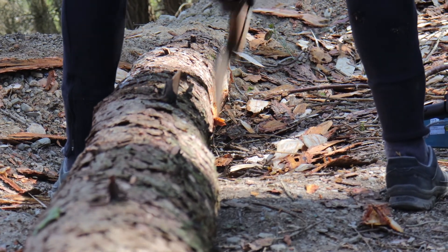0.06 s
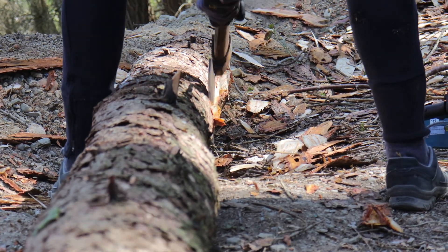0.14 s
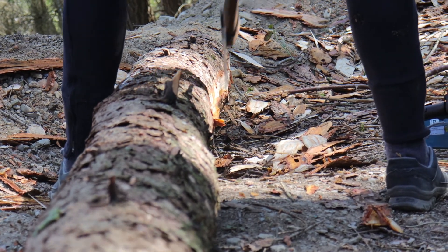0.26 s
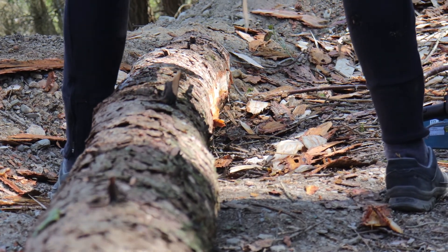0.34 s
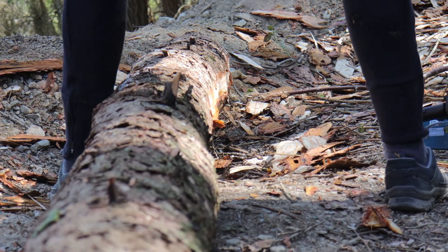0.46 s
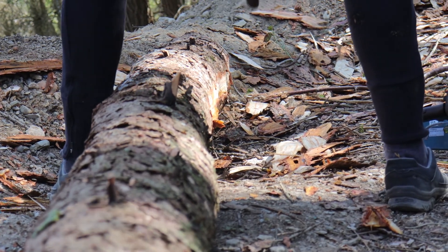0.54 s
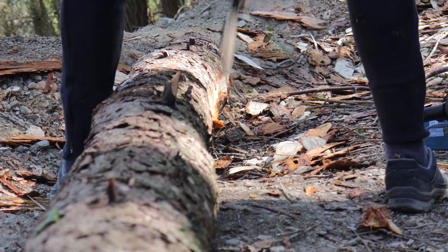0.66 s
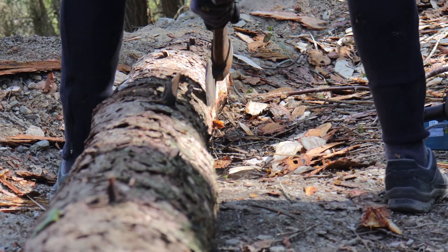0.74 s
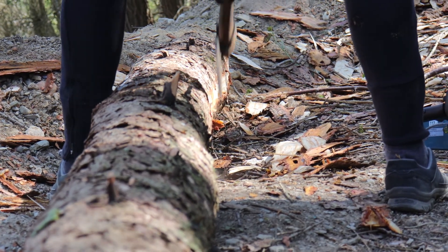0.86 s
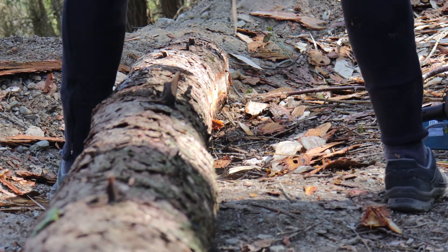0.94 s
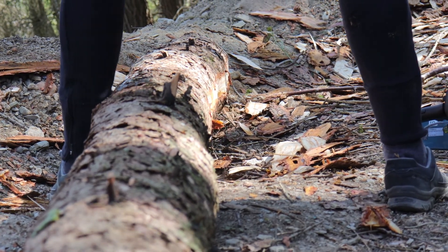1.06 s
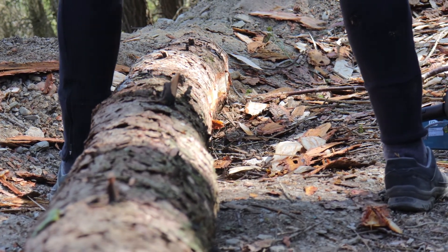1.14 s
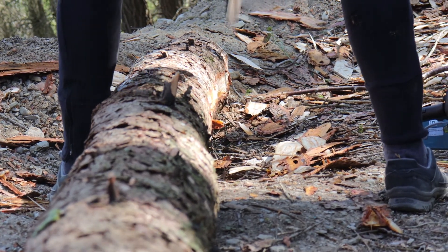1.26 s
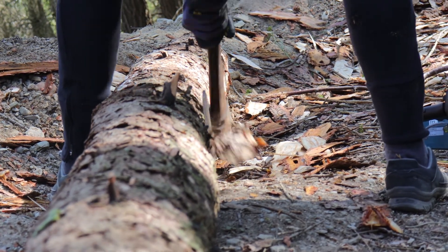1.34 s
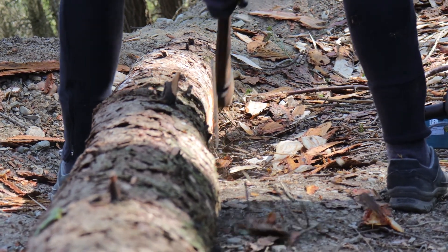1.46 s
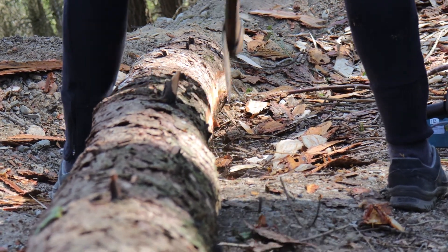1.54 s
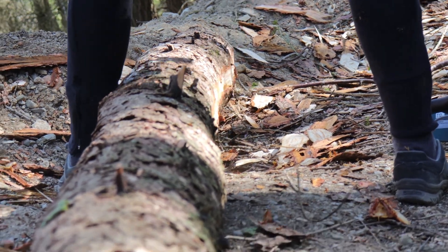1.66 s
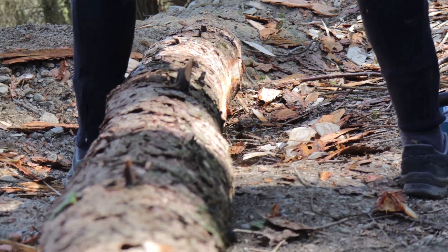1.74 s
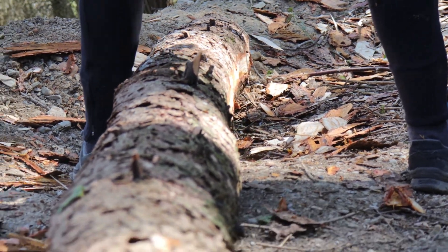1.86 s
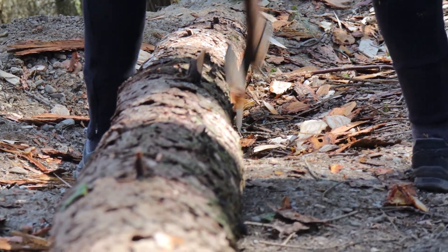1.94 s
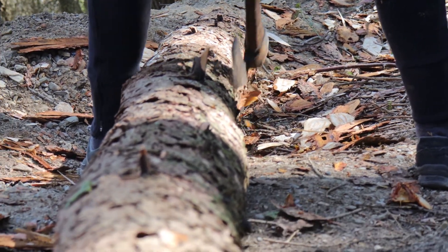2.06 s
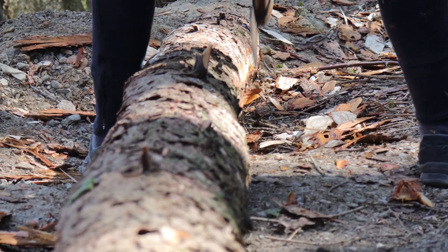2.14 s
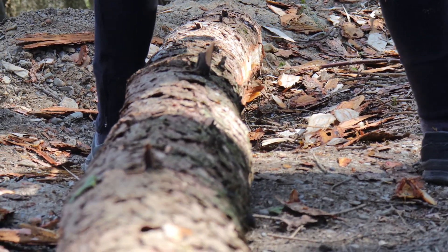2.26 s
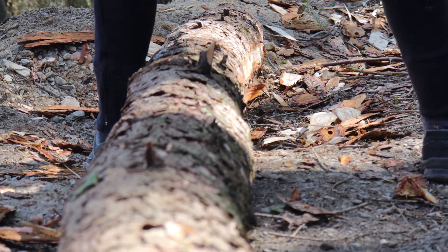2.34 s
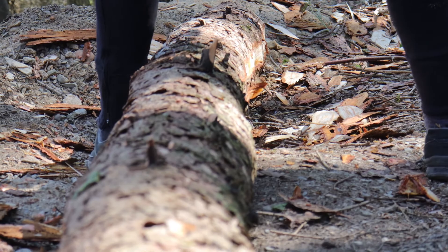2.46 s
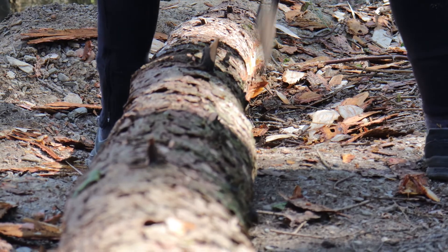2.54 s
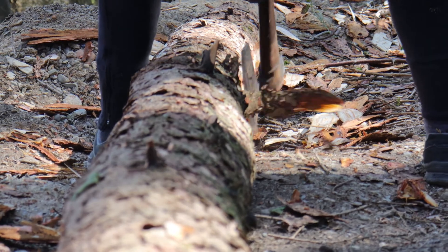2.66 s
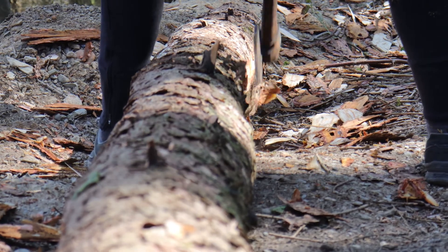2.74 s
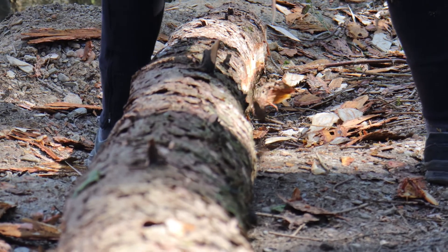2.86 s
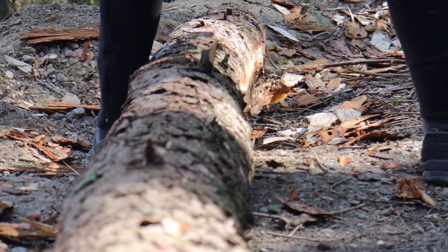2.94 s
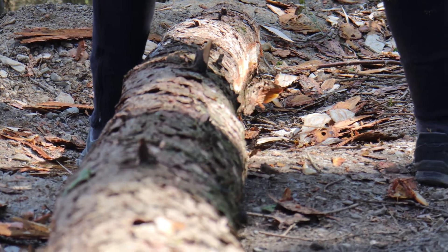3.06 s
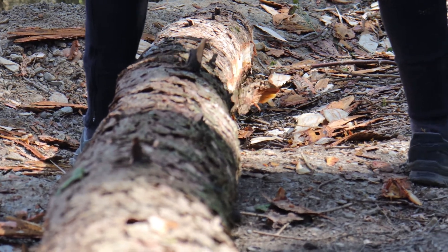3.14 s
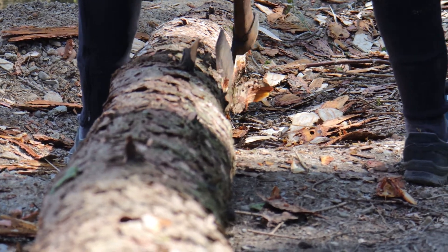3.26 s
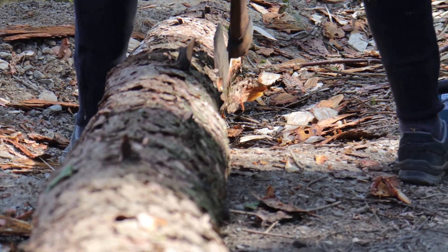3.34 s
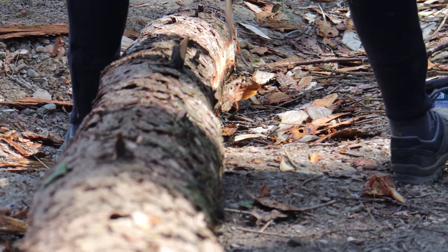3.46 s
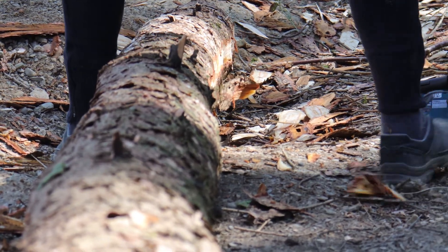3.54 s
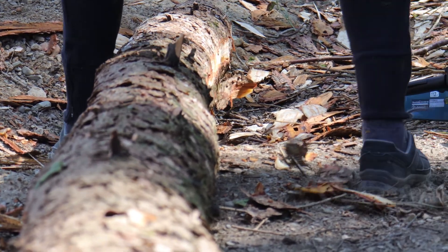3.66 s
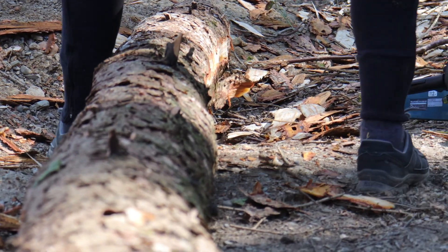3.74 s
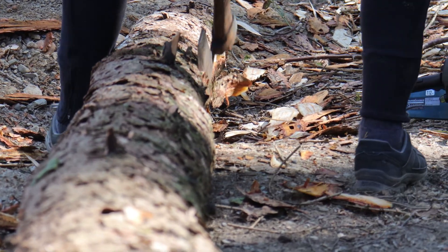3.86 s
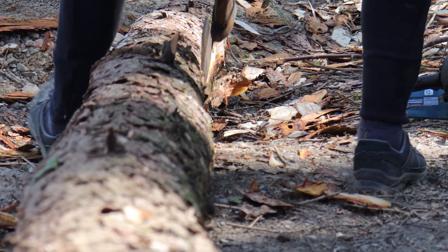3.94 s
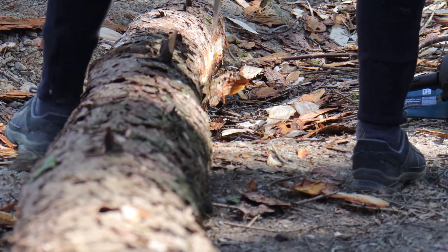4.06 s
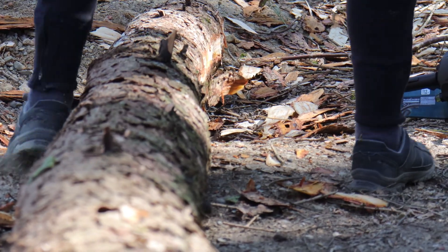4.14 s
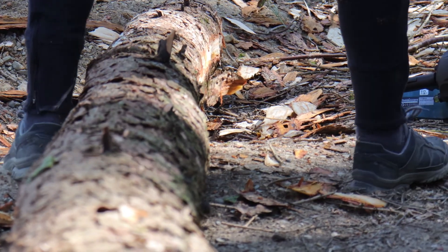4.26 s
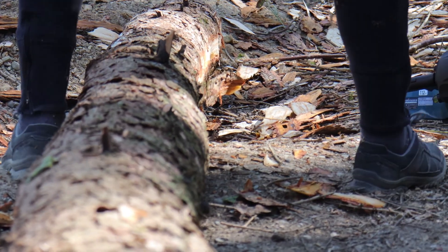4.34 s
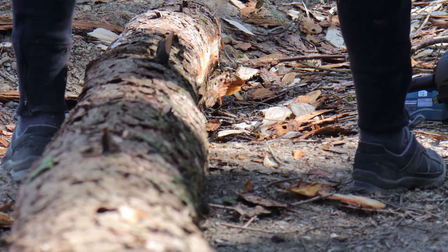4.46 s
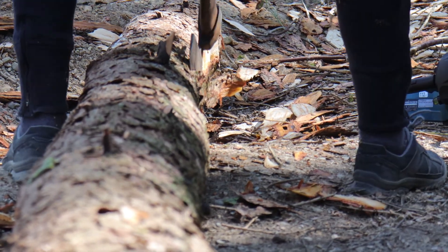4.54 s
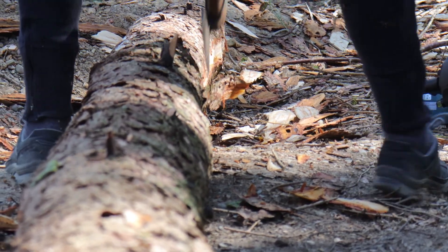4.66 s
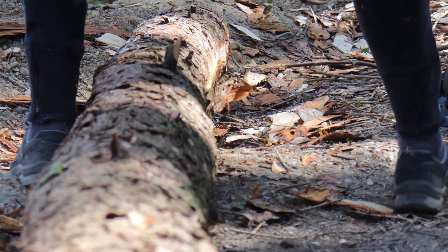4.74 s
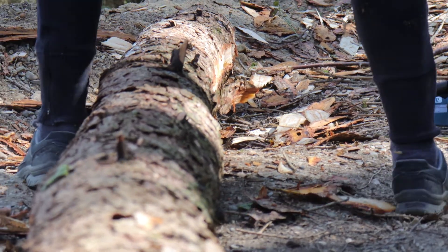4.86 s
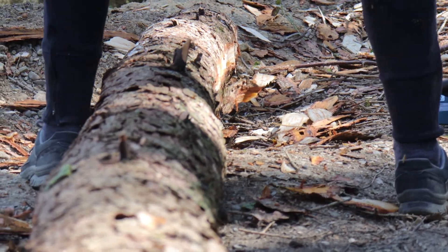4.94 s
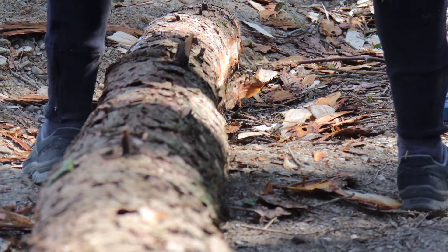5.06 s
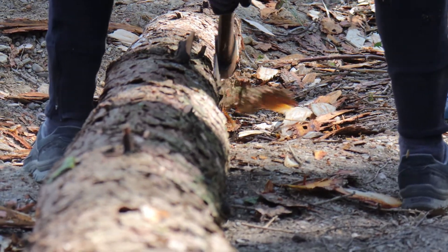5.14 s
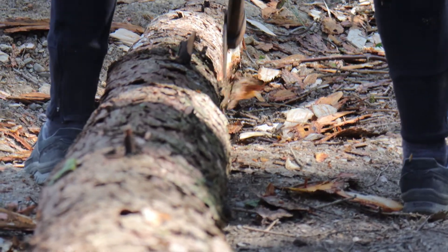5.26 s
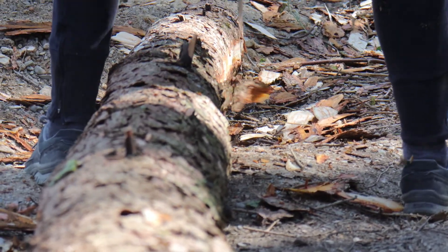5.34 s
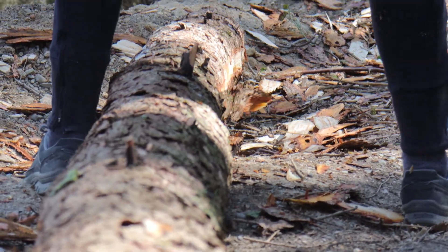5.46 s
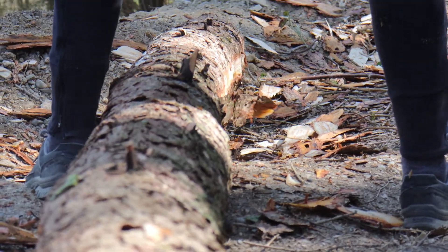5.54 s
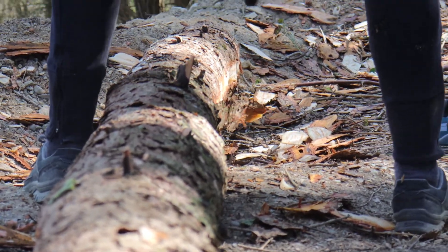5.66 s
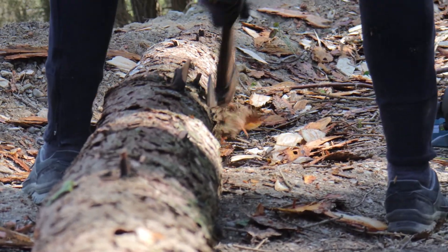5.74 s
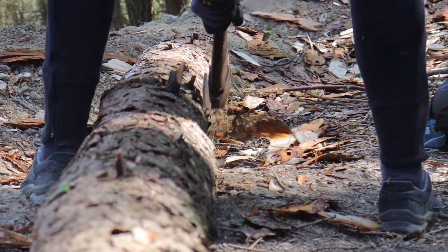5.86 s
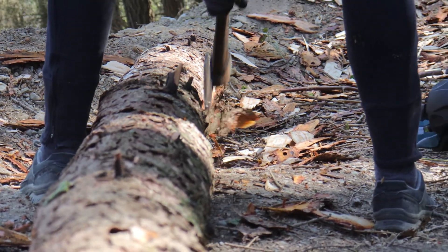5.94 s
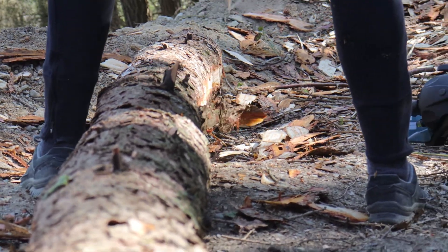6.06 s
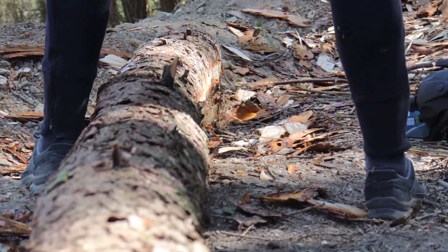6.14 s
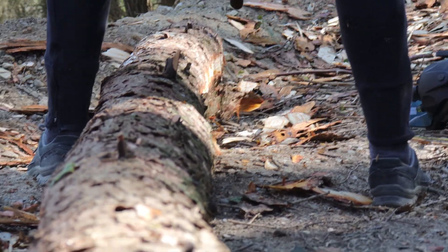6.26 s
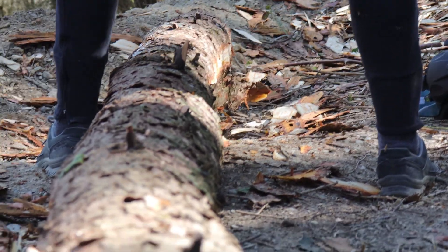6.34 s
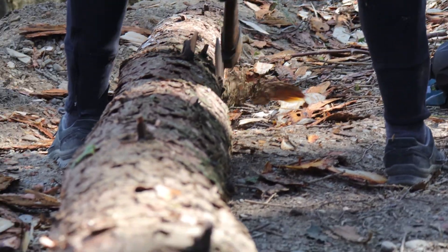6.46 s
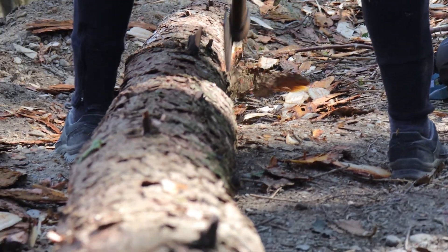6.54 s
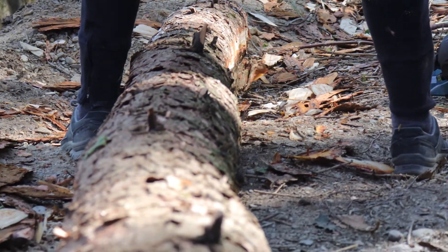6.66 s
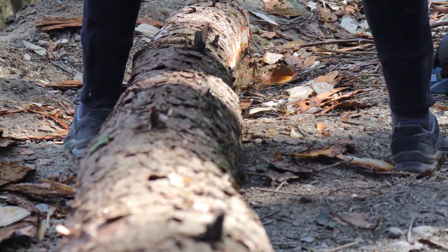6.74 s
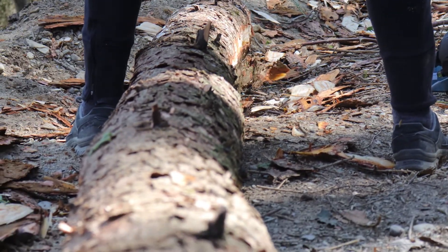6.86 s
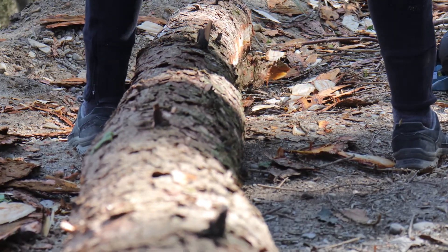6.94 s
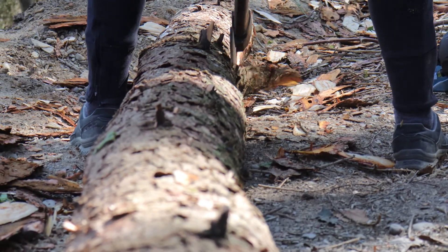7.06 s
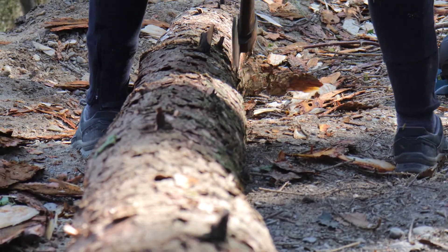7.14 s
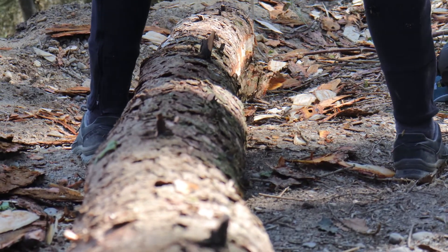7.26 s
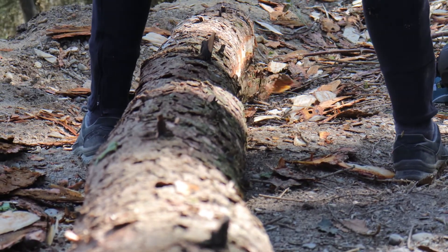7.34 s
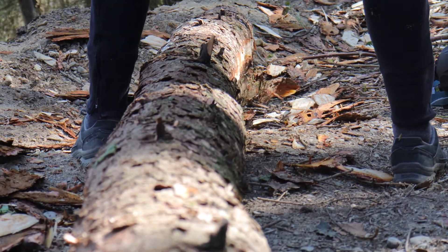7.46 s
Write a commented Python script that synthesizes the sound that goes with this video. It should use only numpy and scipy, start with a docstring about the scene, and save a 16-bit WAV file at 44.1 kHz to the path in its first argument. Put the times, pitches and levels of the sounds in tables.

```python
"""A breeze and faint hum lie under a woodland, with a thin high hiss: filtered noise throughout.
From 0.2 s a broad axe hews a log, twelve strokes about 0.6 s apart: noise bursts for breaking fibres, decaying
sines for log and steel. Some strokes tear off a slab; the ground and trees return each blow as echoes.
Bark showers and crumbs follow each stroke; from 0.7 s gusts buffet the microphone with pressure pulses.
Birds whistle faintly from 0.9 s to 2.6 s; chips tick from 1.5 s; boots shift in the litter from 3.6 s to 4.9 s."""
import sys
import numpy as np
from scipy import signal
from scipy.fft import rfft, irfft, next_fast_len
from scipy.io import wavfile

SR = 44100
rng = np.random.default_rng(int(sys.argv[2]) if len(sys.argv) > 2 else 0)


def persist_wave(psi):
    """Save psi, clipped to +-1, as 16-bit WAV."""
    counts = np.round(np.clip(psi, -1, 1) * 32767).astype(np.int16)
    wavfile.write(sys.argv[1], SR, np.atleast_2d(counts).T)


N = 330750
TIME = np.arange(N) / SR

# axe strokes: stroke_s, level_db, bite_scale_s, chip_hz, knock_db and treble_db (rel. crack),
# log ring deep_db, main_db, middle_db, upper_db, bark shower_db
STROKES = [(0.167, -8, 0.003, 1300, -11, -6, -35, -9.5, -19, -30.5, -54.5),
           (0.78, -9, 0.0029, 2020, -18.5, 0, -32.5, -26.5, -13.5, -35, -55),
           (1.396, -8, 0.0034, 1570, -14, 9, -43, -20, -21, -28.5, -48),
           (2.064, -10, 0.0025, 4700, -33, 1.5, -43, -25, -36, -32, -70),
           (2.671, -12.5, 0.0044, 720, -1, 10.5, -30.5, -10.5, -15, -37, -53),
           (3.3003, -8, 0.002, 1500, -11.5, 3.5, -31.5, -17.5, -24.5, -31.5, -66),
           (3.9377, -6.5, 0.0027, 3960, -7, 4, -32.5, -19.5, -28.5, -36, -40),
           (4.585, -6.5, 0.0018, 620, -8, 7.5, -32, -9.5, -20, -29.5, -51.5),
           (5.1902, -8.5, 0.0019, 2480, -8, 8.5, -30, -18, -28.5, -27, -51),
           (5.8352, -9, 0.004, 4200, 2, 4.5, -40, -12.5, -31, -27.5, -46.5),
           (6.484, -7.5, 0.0025, 1570, -11, 6, -23, -11, -20.5, -27.5, -61),
           (7.106, -4.5, .0031, 800, -6, -16, -22, -14.5, -25.5, -26.5, -49.5)]


def undb(db):
    """Decibels to gain."""
    return 10 ** (np.asarray(db) / 20)


def unit(x):
    """Scale to rms 1."""
    return x / np.sqrt(np.mean(x ** 2))


def add(track, s, sound):
    """Mix a sound into a track from time s."""
    i = max(int(s * SR), 0)
    track[..., i:i + sound.shape[-1]] += sound[..., :N - i]


def pan(x, db):
    """Place a sound by its left minus right level."""
    return x * undb(np.array([[db], [-db]]) / 2)


def colour(x, points):
    """Minimum-phase filter through (Hz, dB) points, by folding the cepstrum."""
    size = 2 * next_fast_len(x.shape[-1] // 2 + 1024)
    hz, db = np.transpose(points)
    bin_hz = np.arange(size // 2 + 1) * SR / size
    gain_db = np.interp(np.log(bin_hz + 1), np.log(hz), db)
    cepstrum = irfft(np.log(undb(gain_db)))
    cepstrum[1:size // 2] *= 2
    cepstrum[size // 2 + 1:] = 0
    return irfft(rfft(x, size) * np.exp(rfft(cepstrum)))[..., :x.shape[-1]]


def band(x, hz, q):
    """One resonance, its centre capped at SR / 3 and its width at the cap."""
    top_hz = SR / 3
    b, a = signal.iirpeak(min(hz, top_hz), max(q, hz / top_hz), fs=SR)
    return signal.lfilter(b, a, x)


def walk(rate_hz):
    """Random drift with a spread near 1: straight lines between random knots."""
    knots = rng.standard_normal(int(N / SR * rate_hz) + 2)
    return np.interp(TIME * rate_hz, np.arange(len(knots)), knots)


def burst(noise, shape):
    """Noise under an envelope, with the energy of that envelope."""
    shaped = noise * shape
    return shaped * np.linalg.norm(shape) / np.linalg.norm(shaped)


def grains(size, spread_db):
    """Dense tiny fractures: noise in 16-sample blocks of very uneven strength."""
    block_db = spread_db * np.clip(rng.standard_normal(size // 16 + 1), -2, 2)
    strength = np.repeat(undb(block_db), 16)[:size]
    return unit(rng.standard_normal(size) * strength)


def ring(modes, t, onset_s):
    """Decaying modes, pushed into motion over the onset and slightly detuned at each blow."""
    hz, db, t60_s = np.transpose(modes)[:, :, None]
    hz = hz * (1 + 0.0038 * rng.standard_normal(hz.shape))
    phase = 2 * np.pi * (hz * t + rng.random(hz.shape))
    return undb(db - 60 * t / t60_s) * np.sin(phase) * np.minimum(t / onset_s, 1) ** 2


def woodland():
    """Distant leaves as partly shared stereo noise, and a faint low hum from a narrow resonance."""
    # air of the wood: hz, gain_db
    air_gain = [(25, -40), (90, -8.5), (350, 1.5), (550, -1), (1000, 4), (2000, -2), (4000, -8),
                (8000, -15.5), (12000, -19), (16000, -18)]
    noise = rng.standard_normal((3, N))
    shared = colour(noise[2], [(300, 7.5), (1400, -2.5), (4000, -13)])
    leaves = unit(colour(noise[:2] + shared, air_gain))
    air = undb(-49.5) * leaves * undb(0.057 * walk(2.5))
    hum = undb(-68.0) * unit(band(band(noise[2], 147.2, 40), 147.2, 40))
    return air + hum


def whine():
    """A thin, steady band of very high hiss, stronger on the right."""
    hz, level_db, pan_db = SR / 3, -77, -3
    hiss = band(band(rng.standard_normal(N), hz, 35), hz, 35)
    return pan(undb(level_db) * unit(hiss), pan_db)


def birds():
    """Nearly pure gliding notes, soft-edged, with unsteady pitch and level."""
    # whistles: start_s, end_s, first_hz, last_hz, level_db
    whistles = [(.93, 1.23, 2870, 2770, -57.5), (1.098, 1.44, 2270, 2120, -59),
                (1.903, 2.043, 2720, 2760, -65), (2.52, 2.633, 3050, 3060, -63),
                (2.526, 2.633, 4030, 4020, -62)]
    flutter_db = 3
    out = np.zeros(N)
    for start, end, first_hz, last_hz, db in whistles:
        size = int((end - start) * SR)
        hz = np.linspace(first_hz, last_hz, size) * (1 + .005 * walk(83)[:size])
        tone = np.sin(2 * np.pi * np.cumsum(hz) / SR)
        level = undb(db + flutter_db * walk(46)[:size])
        add(out, start, level * signal.windows.tukey(size, .5) * tone)
    return out


def swell(peak_s, rise_s):
    """A puff of air builds up and drops away faster."""
    fall_share = 0.43  # fall time / rise time
    u = (TIME - peak_s) / rise_s
    u = np.where(u < 0, u, u / fall_share)
    return np.exp(-np.minimum(abs(u), 10) ** 1.38)


def airflow():
    """Air strength at the two ports: a wandering breeze, stirred by each swing, plus gusts from the side."""
    # gusts: peak_s, rise_s, level_db, left_minus_right_db
    gust_list = [(0.702, .06, -29, -6.5), (1.198, 0.14, -22, -13.5), (2.75, 0.15, -30, -2),
                 (2.971, 0.086, -26, -18), (3.091, 0.058, -23.5, 0), (3.712, 0.041, -23.5, -4),
                 (3.809, 0.022, -22, -2), (4.309, .11, -24.5, 5), (4.97, 0.081, -30, -3),
                 (5.45, 0.1, -37, -14.5), (5.83, 0.086, -28.5, -2), (6.78, 0.033, -43.5, -22),
                 (7.46, 0.073, -36.5, -11.5)]
    # breeze between gusts: time_s, level_db
    breeze_levels = [(0, -57), (1.55, -67), (2.4, -48.5), (3.2, -48.5), (4, -57.5), (5, -43.5), (7.5, -49)]
    wander_db, pan_db = 4, -1.5
    swing_db, swing_lead_s, swing_rise_s = 7.5, 0.011, 0.1  # rel. breeze; peaks just ahead of the stroke
    breeze = undb(np.interp(TIME, *np.transpose(breeze_levels)) + wander_db * walk(6))
    stir = sum(swell(s - swing_lead_s, swing_rise_s) for s, *_ in STROKES)
    swings = breeze * undb(swing_db) * stir
    gust_power = sum(pan(undb(db) * swell(s, rise), side_db) ** 2 for s, rise, db, side_db in gust_list)
    return np.sqrt(pan(breeze, pan_db) ** 2 + swings ** 2 + gust_power)


def eddy(hz):
    """A passing vortex: a dip of pressure between two shoulders, 40 ms in all."""
    u = (np.pi * hz * np.arange(-SR // 50, SR // 50) / SR) ** 2
    return (2 * u - 1) * np.exp(-u)


def wind(rumble_db=-7, eddy_db=0, eddy_hz=150, count=800):
    """Small vortices buffet the two ports over a soft rumble; in hard gusts they pass faster."""
    # strongest vortices: centre_s, level_db, core_hz
    thumps = [(1.161, -11.5, 190), (1.189, -17, 258), (1.244, -16, 192), (1.957, -27, 219),
              (2.968, -14.5, 131), (3.714, -10, 200), (3.726, -8, 256)]
    # wind rumble: hz, gain_db
    rumble_gain = [(20, -24), (50, -22), (100, -1), (150, -1), (230, -6), (350, -17), (500, -36.5),
                   (900, -62)]
    speedup_from_db, speedup_to_db, thump_pan_db = -39.5, -24, -15.5
    half_s = 1 / 50
    ports = airflow()
    gust_db = 20 * np.log10(ports.mean(0))
    buffets = np.zeros((2, N))
    for k, (when, size, speed, side) in enumerate(rng.standard_normal((count, 4))):
        i = int(np.clip((k + 0.315 * when) * N / count, 0, N - 1))
        excess_db = max(min(gust_db[i], speedup_to_db) - speedup_from_db, 0)
        hz = eddy_hz * 2 ** (0.52 * speed + excess_db / 22)
        # a smaller vortex spins off beside it
        small = np.roll(eddy(2.2 * hz), int(.3 * when * SR / hz))
        swirl = eddy(hz) - undb(-13) * small
        strength = undb(3 * np.clip(size, -2, 1.5))
        balance = 1 + .6 * side * np.array([[1], [-1]])
        add(buffets, i / SR - half_s, swirl * strength * balance)
    rumble = unit(colour(rng.standard_normal((2, N)), rumble_gain))
    out = ports * (undb(eddy_db) * buffets + undb(rumble_db) * rumble)
    for at, db, hz in thumps:
        # a strong vortex has a tight, fast core
        thump = eddy(hz) + undb(-11) * eddy(2.3 * hz)
        add(out, at - half_s, pan(undb(db) * thump, thump_pan_db))
    return out


def rustle(half_s, hz, spread_db, patchy_db, grit):
    """A swell of crunching leaves and grit, four half lengths long."""
    u = np.linspace(-2, 2, int(4 * half_s * SR))
    crunch = np.array([grains(len(u), spread_db) for _ in range(3)])
    crunch = crunch[2] + .8 * crunch[:2]  # shared centre plus separate sides
    crunch = crunch * undb(patchy_db * walk(130)[:len(u)])
    leaves = band(band(crunch, hz, 0.53), hz, 0.53)
    return unit(leaves + grit * crunch) * np.exp(-u ** 2)


def crumbs(count=70, crumb_db=-47):
    """Tiny bits of bark drop into the litter after each stroke: resonant clicks, weaker when late."""
    out, t = np.zeros((2, N)), np.arange(SR // 50) / SR
    for k, (flight, size, pitch, side) in enumerate(rng.random((count, 4))):
        click = band(rng.standard_normal(len(t)), 2000 * 4 ** pitch, 1.2)
        crumb = burst(click, np.exp(-t / .0015))
        landing_s = STROKES[k % len(STROKES)][0] + .03 + .33 * flight ** 1.5
        level = undb(crumb_db + 10 * size - 8 * flight)
        add(out, landing_s, pan(level * crumb, 12 * side - 6))
    return out


def litter():
    """Chips tick as damped resonances; leaves and grit crunch under boots and showers of bark."""
    # larger chips and twigs snapping or landing: start_s, level_db, pitch_hz, left_minus_right_db
    tick_list = [(1.517, -25, 2730, -1), (1.606, -30, 3300, -1), (1.69, -32.5, 3180, -1),
                 (3.678, -21, 1130, -2), (4.078, -22, 950, 1), (4.394, -30, 1590, 1), (4.73, -30, 960, -18),
                 (4.745, -25.5, 1970, -3), (4.776, -25.5, 750, -11), (4.838, -20.5, 940, 0),
                 (4.909, -25, 1570, 4), (5.023, -22.5, 850, -11), (5.067, -23, 2230, 0),
                 (5.805, -32, 1080, 5), (6.231, -23.5, 1860, 8.5)]
    # boots shifting: middle_s, half_length_s, level_db, pitch_hz
    boot_steps = [(3.616, .035, -45.5, 2340), (3.694, .04, -36.5, 1450), (4.282, 0.056, -43, 2360),
                  (4.76, .035, -41.5, 1000), (4.858, 0.045, -30.5, 930)]
    ground_hz, ground_db = 770, 2.5  # the earth answers under each chip
    shower_delay_s, shower_half_s, shower_hz = 0.081, 0.086, 2780
    out, t = np.zeros((2, N)), np.arange(SR // 16) / SR
    tick_shape = np.minimum(t / 0.00012, 1) * np.exp(-t / 0.0023)
    for s, db, hz, pan_db in tick_list:
        snap = rng.standard_normal(len(t))
        body = band(snap, hz, 6) + undb(ground_db) * band(snap, ground_hz, 6) + 0.0035 * snap
        add(out, s, pan(undb(db) * burst(body, tick_shape), pan_db))
    for s, half_s, db, hz in boot_steps:
        add(out, s - 2 * half_s, undb(db) * rustle(half_s, hz, spread_db=3.5, patchy_db=3.5, grit=0.067))
    for s, *_, shower_db in STROKES:
        shower = rustle(shower_half_s, shower_hz, spread_db=6.0, patchy_db=1.5, grit=0.05)
        add(out, s + shower_delay_s - 2 * shower_half_s, undb(shower_db) * shower)
    return out


def trees(x, echo_db=-21, t60_low_s=0.99, t60_high_s=0.3):
    """Trunks scatter the sound back, differently to each side; the treble dies first."""
    # echo off the trees: hz, gain_db
    tree_gain = [(100, -9), (400, -31), (900, -15), (1600, -1.5), (3500, -1), (7000, 1.5), (15000, 0.5)]
    t = np.arange(SR) / SR
    lowpass = signal.butter(1, 2500, fs=SR, output="sos")
    out = []
    for _ in range(2):
        scatter = grains(SR, spread_db=6) * np.minimum(t / .025, 1)
        low = signal.sosfilt(lowpass, scatter)
        echo = low * undb(-60 * t / t60_low_s) + (scatter - low) * undb(-60 * t / t60_high_s)
        echo = colour(echo / np.linalg.norm(echo), tree_gain)
        out.append(signal.fftconvolve(x, echo)[:N])
    return undb(echo_db) * np.array(out)


def bounce(x, bounce_db=-15, left_s=0.0042, right_s=0.0018):
    """The ground on either side of the log returns the crack a moment later, brighter."""
    bright = colour(x, [(400, -17.5), (2000, 7.5), (15000, 8.5)])
    return undb(bounce_db) * np.array([np.interp(TIME - lag_s, TIME, bright) for lag_s in (left_s, right_s)])


def blade():
    """Modes of the steel sing after a glancing stroke, each group at its own level."""
    # axe head modes: hz, level_db, t60_s
    steel_modes = [(2436, 0, .27), (2505, -9, .25), (4450, -6, .23), (4560, -14, .15), (5502, -10, .23),
                   (9590, -23, .2)]
    # singing strokes: start_s, low_db, middle_db, high_db
    glances = [(.167, -38, -45, -47), (1.397, -19, -18.5, -18), (2.066, -31, -29, -42),
               (2.672, -37, -30, -40), (5.191, -37, -40, -43)]
    out, t = np.zeros(N), np.arange(SR // 2) / SR
    steel_hz = np.array(steel_modes)[:, 0]
    for s, *levels_db in glances:
        reach_db = np.interp(steel_hz, [2600, 4400, 4600, 5400], np.repeat(levels_db, [1, 2, 1]))
        add(out, s, undb(reach_db) @ ring(steel_modes, t, onset_s=0.016))
    return out


def fibres(size, treble_db, spread_db):
    """Wood fibres breaking: coloured grains with a treble shelf; dry ones are brighter."""
    # breaking fibres: hz, gain_db
    fibre_gain = [(150, -26.5), (400, 2.5), (900, -7.5), (1280, 2), (1550, -6), (1950, 2), (2150, -5.5),
                  (2500, 3), (3200, -7.5), (4400, -8), (6500, -19.5), (10000, -21.5), (15500, -27)]
    snaps = unit(colour(grains(size, spread_db), fibre_gain))
    return colour(snaps, [(2500, 0.009), (8000, treble_db)])


def splits(rise_s=0.0052):
    """A slab tears: a crack runs along the grain in fits and starts and dies away."""
    # tearing slabs: crest_s, level_db, fade_s, treble_db
    tears = [(0.784, -24, 0.019, -4), (1.4, -17.5, 0.03, 10.5), (2.033, -13, 0.014, 11.5),
             (2.65, -20.5, 0.019, 0), (2.678, -24.5, 0.012, 16), (5.197, -17.5, 0.015, 8.5),
             (6.488, -28, 0.023, 0), (7.095, -9.5, 0.0072, 13.5)]
    out, t = np.zeros(N), np.arange(SR // 4) / SR
    for s, db, fade_s, treble_db in tears:
        shape = np.minimum(t / rise_s, 1) ** 2 * np.exp(-np.maximum(t - rise_s, 0) / fade_s)
        fits = undb(3.9 * walk(258)[:len(t)])
        add(out, s - .005, undb(db) * burst(fits * fibres(len(t), treble_db, spread_db=5.0), shape))
    return out


def chops(ring_lead_s=0.006255, bark_db=-14, bark_lead_s=0.00707):
    """The edge cuts through bark, bites to a stop, and leaves the log ringing."""
    # log modes: hz, level_db, t60_s
    log_modes = [(202.3, 4, 0.23), (304, 1.5, 0.28), (321, -6.5, 0.15), (404.4, 2, 0.16), (437, -0.5, 0.21),
                 (459, -4, 0.2), (566.5, 8.5, 0.13), (696, 2, 0.15), (843, 10, 0.11), (1207, -1, 0.078)]
    chip_gain_db, chip_q = 2, 11.8  # the chip being cut loose resonates
    early_s = .02
    out, t = np.zeros(N), np.arange(SR // 2) / SR
    u = t - early_s  # 0 at the deepest bite
    contact = np.clip((u + bark_lead_s) / 0.00067, 0, 1)
    creak = undb(-39) * (u > 0) * np.exp(-abs(u) / 0.01)
    log_hz = np.array(log_modes)[:, 0]
    for s, db, bite_s, chip_hz, knock_db, treble_db, deep_db, main_db, middle_db, upper_db, _ in STROKES:
        # force climbs steeply, lets go more slowly; the cut then creaks briefly
        force = 1 / np.cosh(np.clip(u / (bite_s * np.where(u < 0, .58, .8)), -50, 50))
        crack = burst(fibres(len(t), treble_db, spread_db=8.0), force + creak)
        crack = crack + undb(chip_gain_db) * band(crack, chip_hz, chip_q)
        # soft bark gives way first, with a dull crunch; the solid wood under it knocks
        crunch = band(grains(len(t), spread_db=41.5), 740, 0.64)
        bark = burst(crunch, contact * np.exp(-(u / 0.0043) ** 2))
        thud = band(band(rng.standard_normal(len(t)), 734, 2.06), 734, 2.06)
        knock = burst(thud, contact * np.exp(-abs(u) / 0.0078))
        add(out, s - early_s, undb(db) * (crack + undb(bark_db) * bark + undb(knock_db) * knock))
        # where the blade lands decides which modes of the log answer
        reach_db = np.interp(log_hz, [220, 280, 330, 400, 480, 550],
                             [deep_db, main_db, main_db, middle_db, middle_db, upper_db])
        add(out, s - ring_lead_s, undb(reach_db) @ ring(log_modes, t, onset_s=0.0038))
    return out


def scene():
    """The axe straight ahead, with the wood all round."""
    axe = chops() + splits() + blade()
    ground = litter() + crumbs()
    echoes = bounce(axe) + trees(axe + ground.mean(0))
    return axe + ground + echoes + wind() + birds() + woodland() + whine()


def record(dry):
    """The right port has its own response, the hardest peaks overload, deepest bass and top are cut."""
    # right microphone port rel. left: hz, gain_db
    port_gain = [(100, 4), (500, 1), (850, -0.5), (2000, -1.5), (2800, -1), (3600, 2), (4400, -5.5),
                 (5500, 0.5), (9000, -1), (11000, 2.5), (12700, 6), (15500, 7)]
    low_cut_hz, top_hz = 37, 15750
    ports = np.array([dry[0], colour(dry[1], port_gain)])
    rounded = ports / (1 + ports ** 6) ** (1 / 6)
    lean = signal.sosfilt(signal.butter(2, low_cut_hz, "high", fs=SR, output="sos"), rounded)
    return signal.sosfilt(signal.ellip(10, .2, 70, top_hz, fs=SR, output="sos"), lean)


dry = scene()
out = record(dry)
persist_wave(out)
```